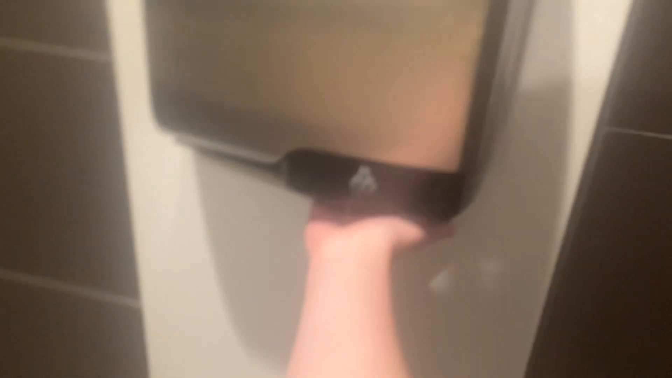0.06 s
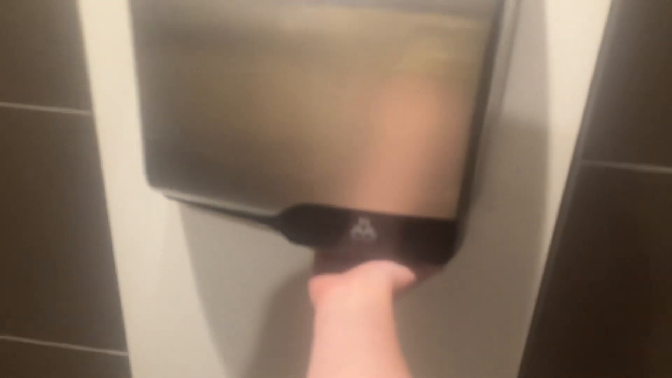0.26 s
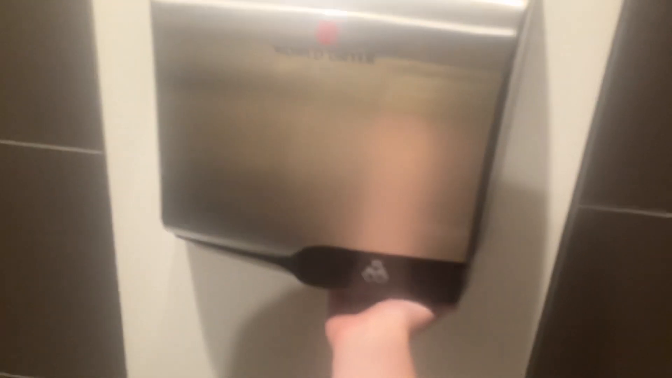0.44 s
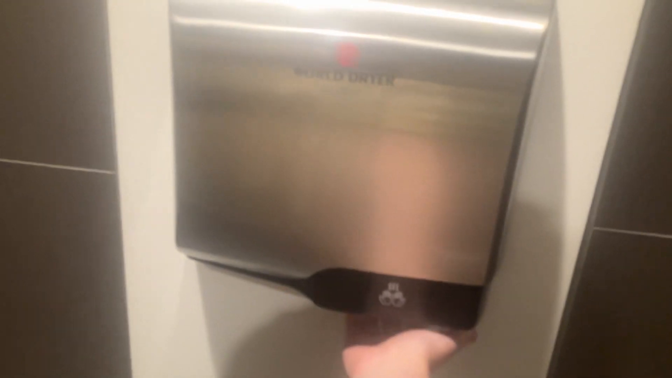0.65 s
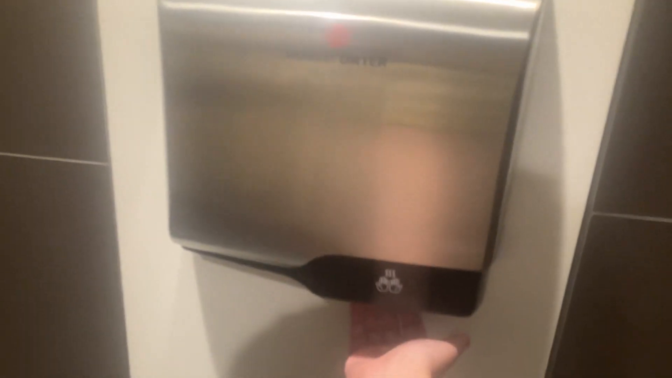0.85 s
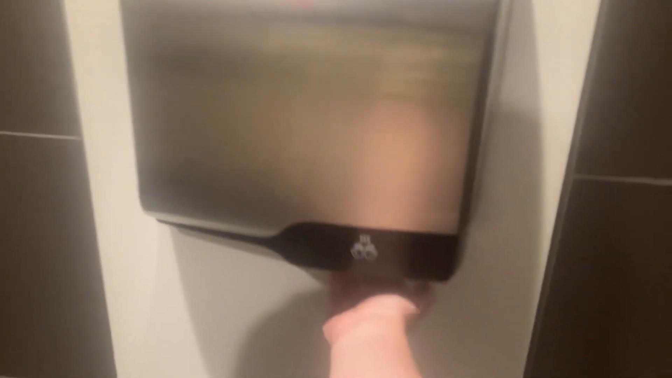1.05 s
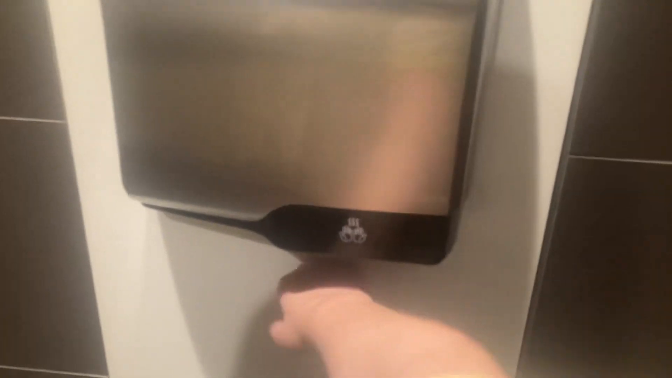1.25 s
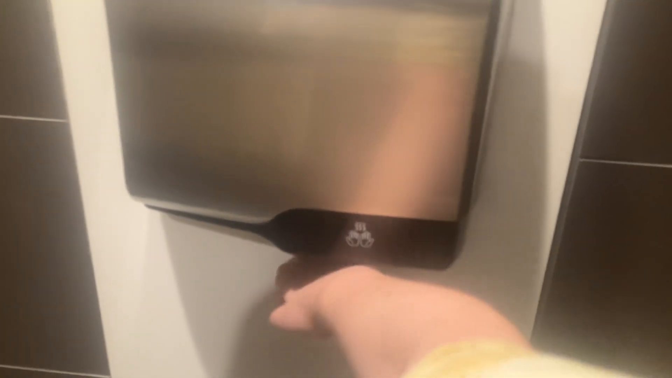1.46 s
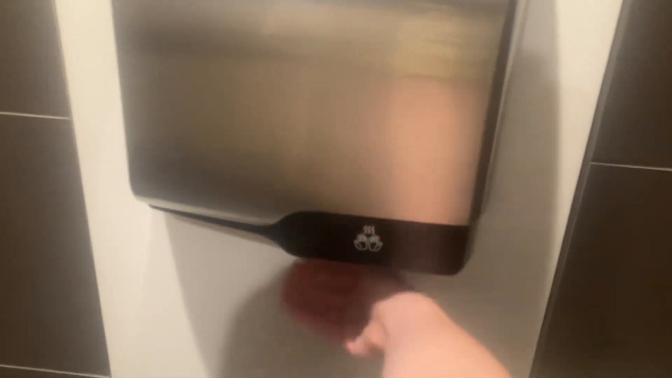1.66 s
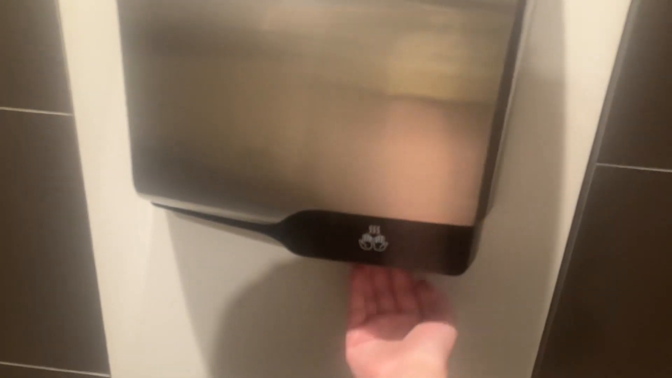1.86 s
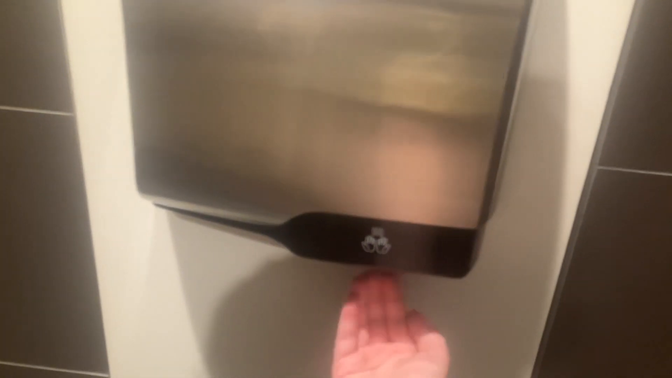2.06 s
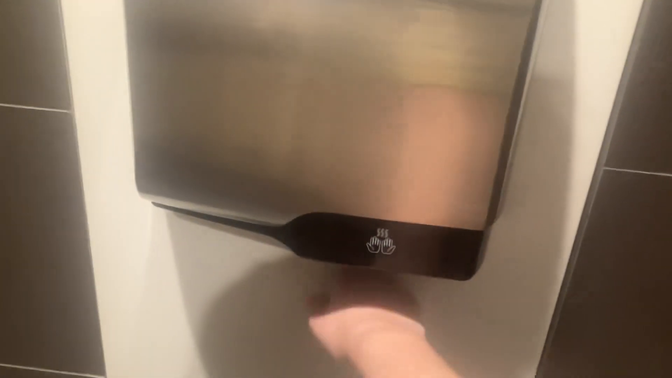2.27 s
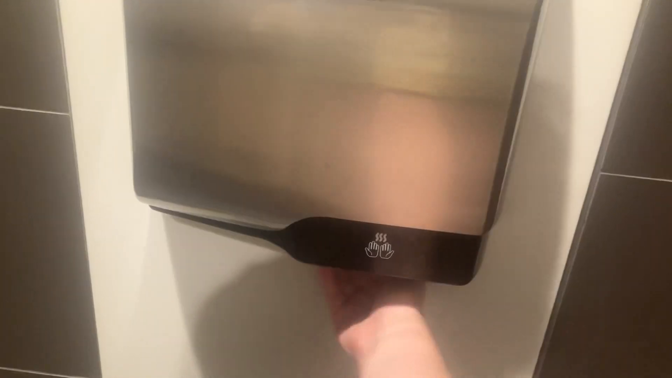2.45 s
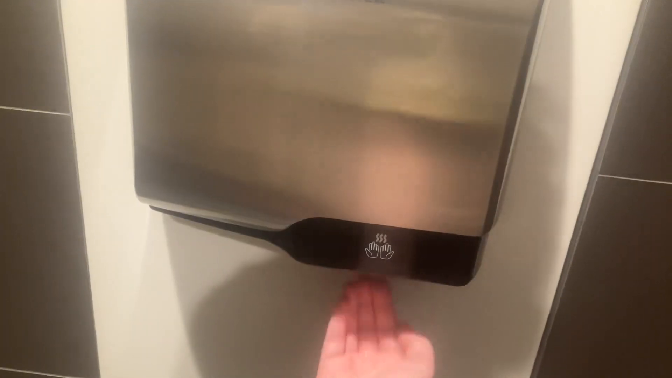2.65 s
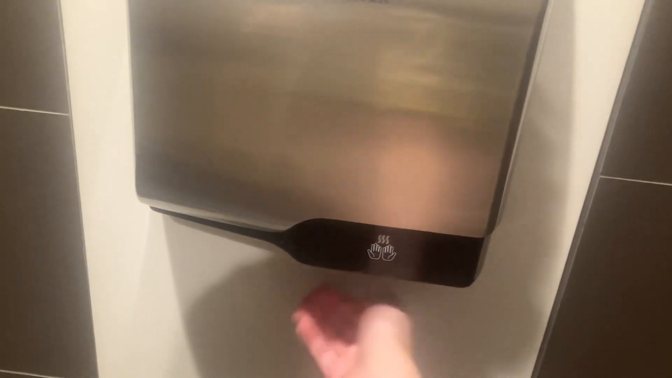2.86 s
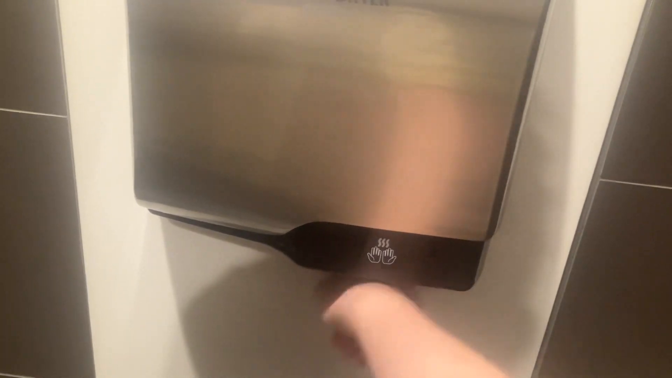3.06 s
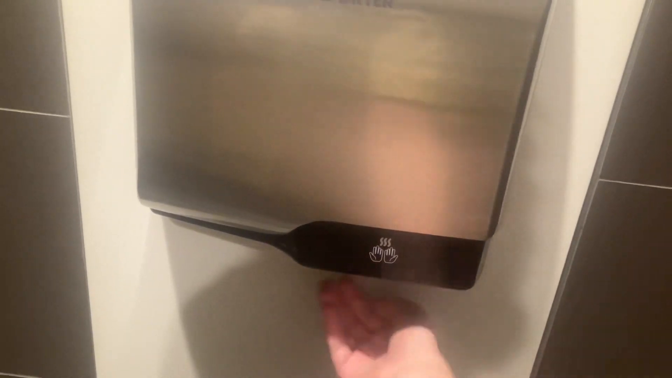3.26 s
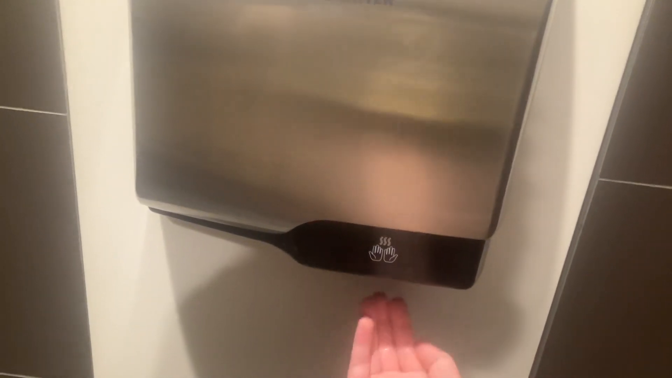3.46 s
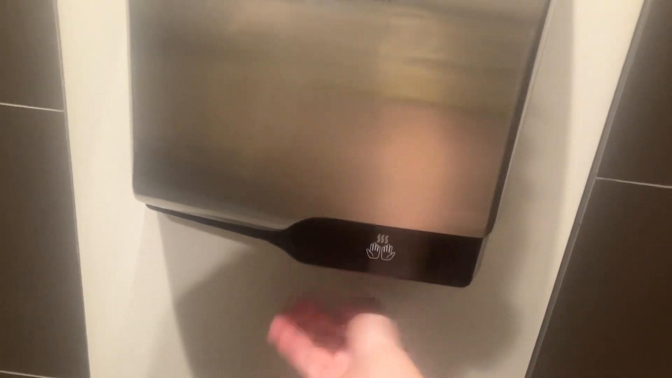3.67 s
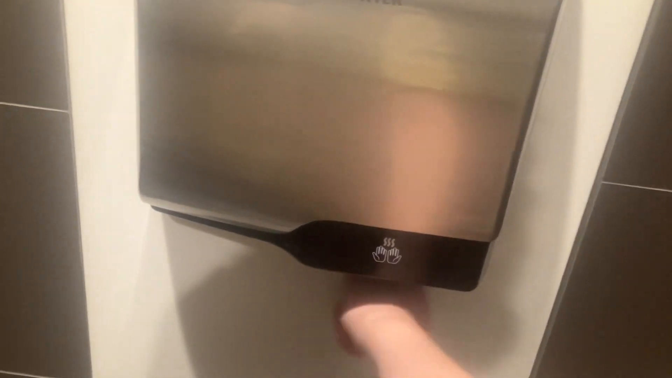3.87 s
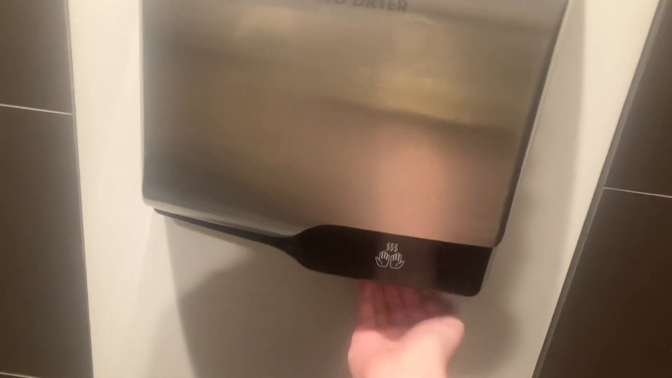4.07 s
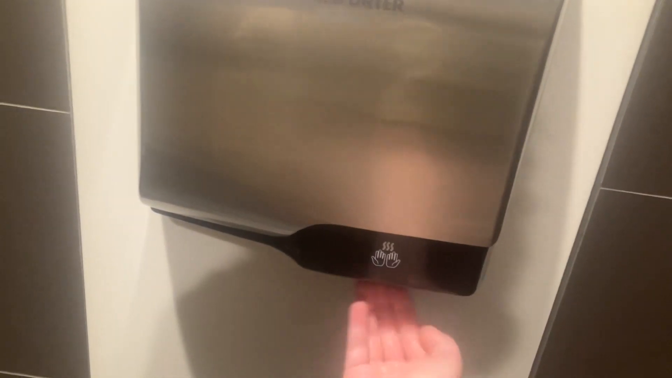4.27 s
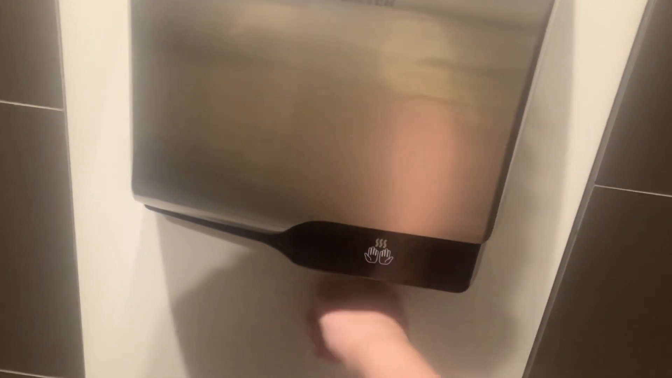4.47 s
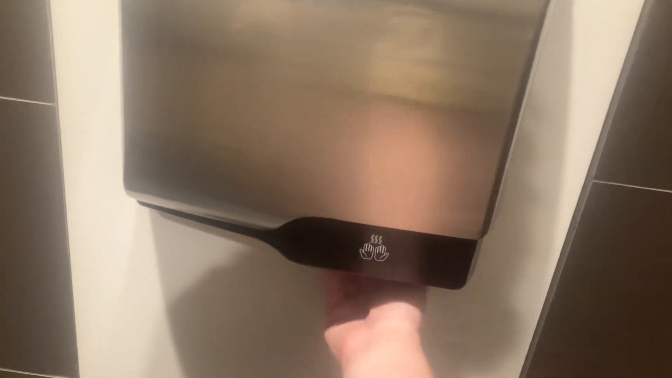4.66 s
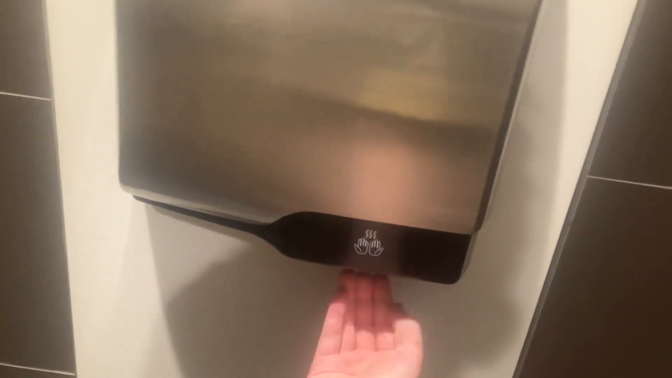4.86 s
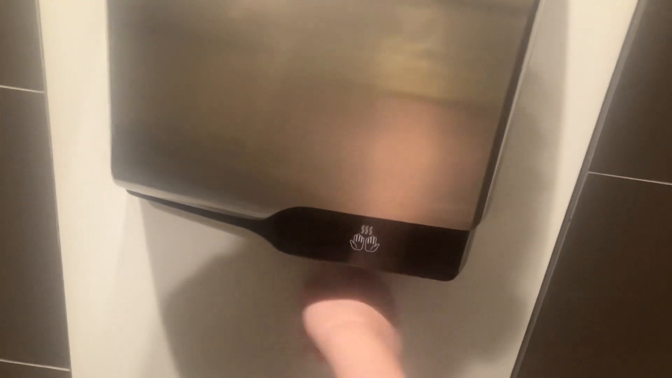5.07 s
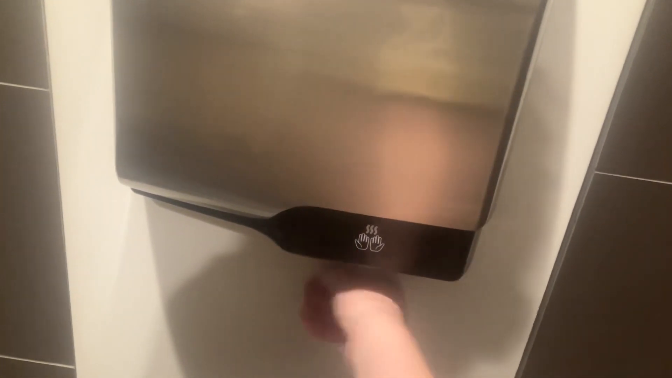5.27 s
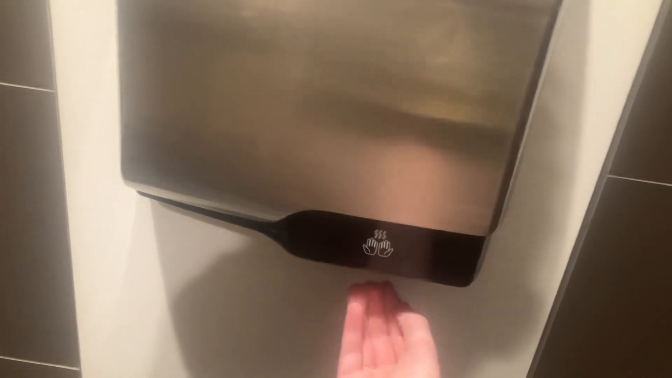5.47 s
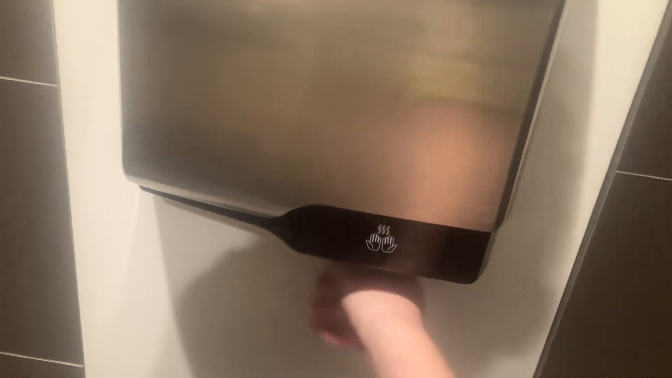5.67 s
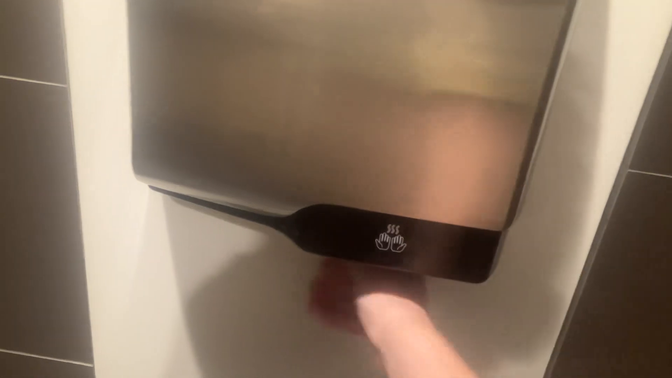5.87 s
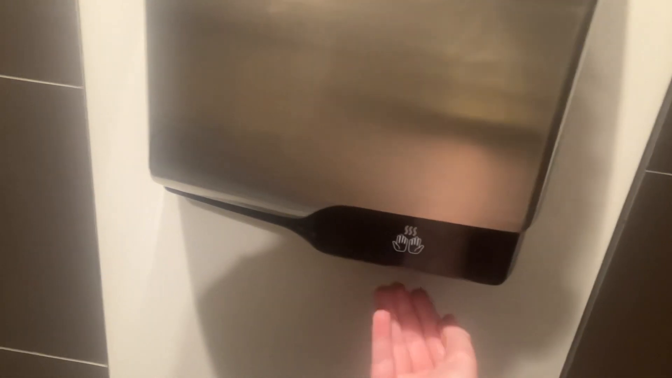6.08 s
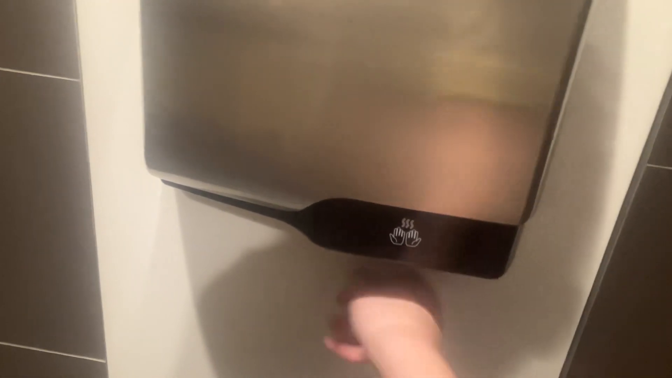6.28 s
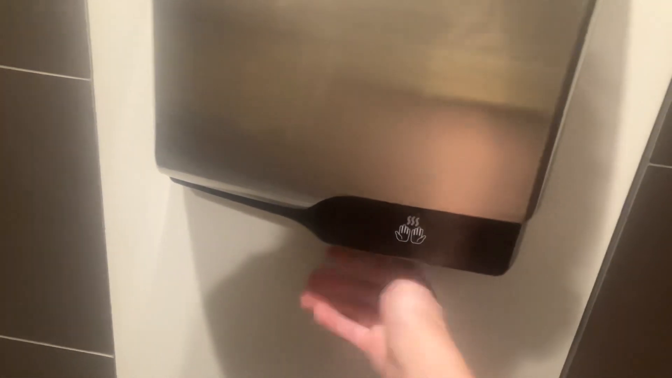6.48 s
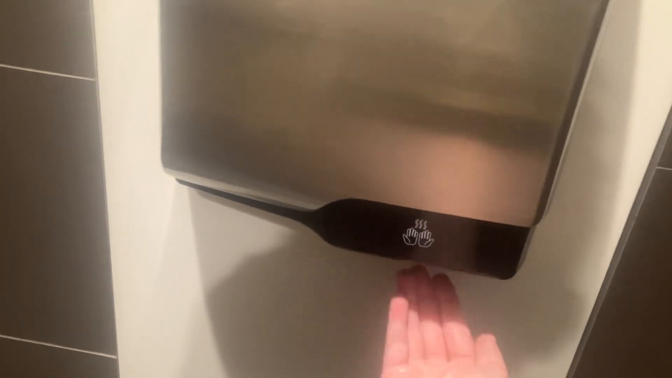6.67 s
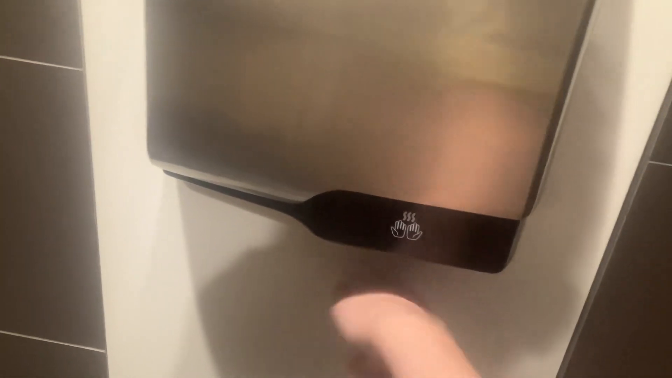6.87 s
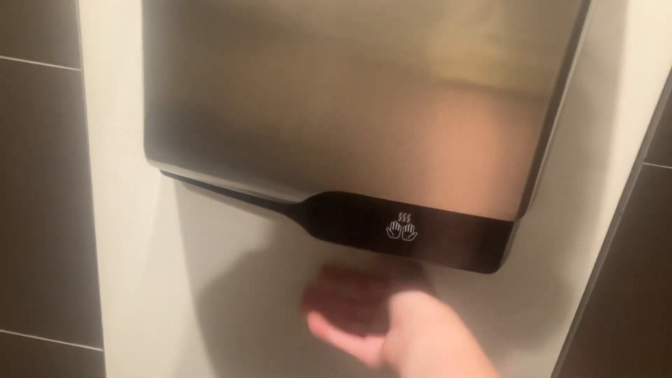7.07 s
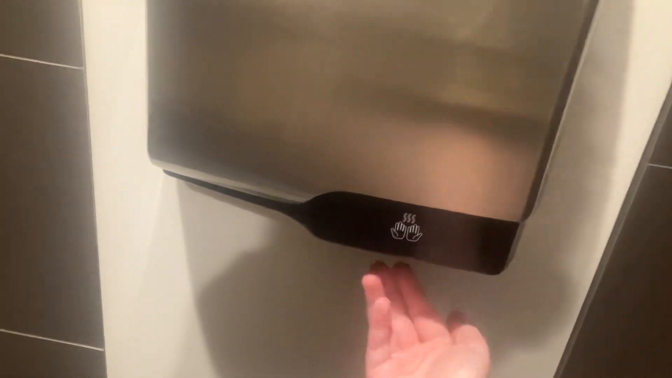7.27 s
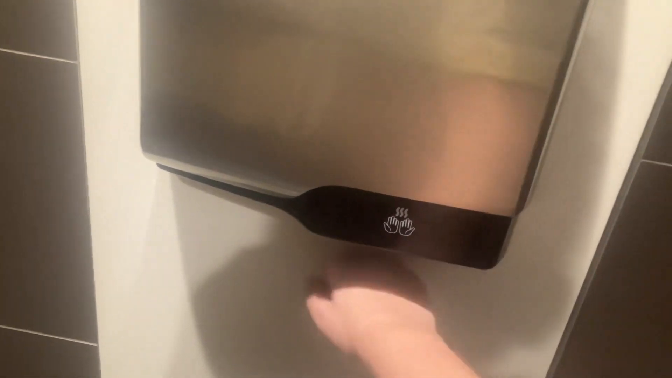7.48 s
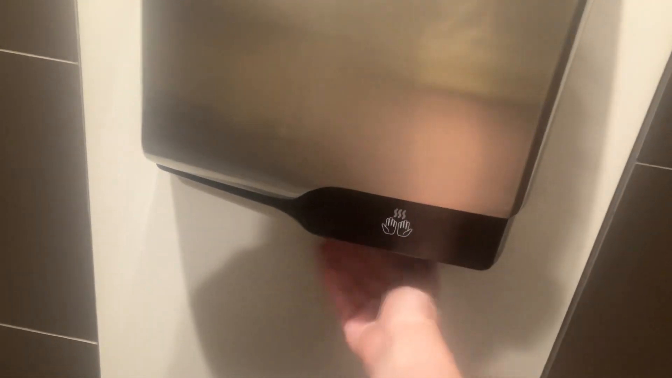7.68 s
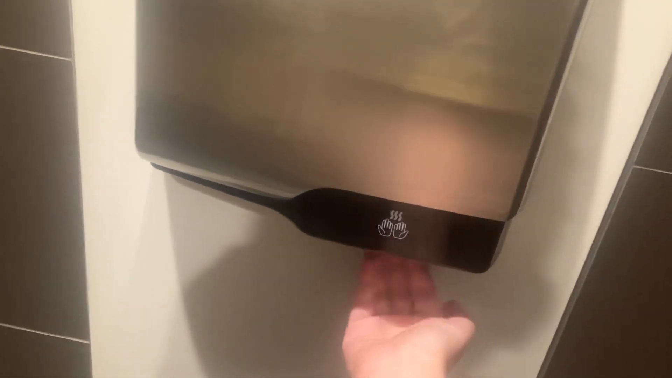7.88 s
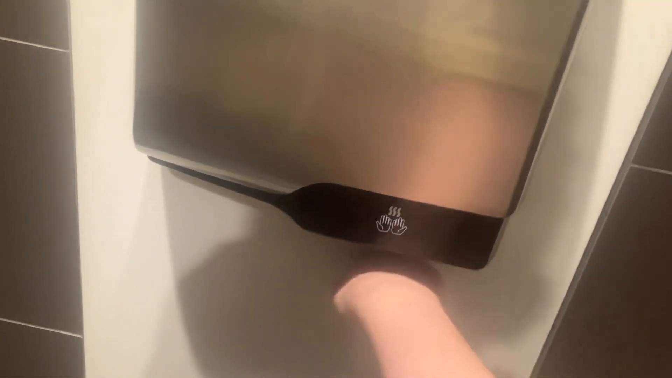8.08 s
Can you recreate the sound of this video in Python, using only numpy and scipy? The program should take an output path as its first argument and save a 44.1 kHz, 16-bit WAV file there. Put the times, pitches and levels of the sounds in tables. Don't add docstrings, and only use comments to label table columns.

```python
import sys
import numpy as np
from scipy import signal
from scipy.fft import rfft, irfft, next_fast_len
from scipy.io import wavfile
from scipy.ndimage import uniform_filter1d, map_coordinates

SR = 44100
rng = np.random.default_rng(int(sys.argv[2]) if len(sys.argv) > 2 else 0)


def undo_db(level):
    steps = np.asarray(level, float) / 20
    return 10 ** steps


def pcm_store(signal):
    levels = np.round(np.clip(np.atleast_2d(signal), -1, 1) * 32767)
    wavfile.write(sys.argv[1], SR, levels.astype(np.int16).T)


N = 358533
TIME_S = np.arange(N) / SR
COARSE_S = np.arange(0, N + 64, 64) / SR
FULL_HZ = 250.7

# pitch_hz, level_db (per Hz)
HISS = [(5200, -48), (5700, 0), (6200, 2.5), (7200, 1.5), (7600, 2.5), (8100, -1.5), (9000, -12),
        (9600, -16.5), (10300, -30.5), (10800, -58)]
# time_s, gain_db (over the settled roar)
GAIN = [(0, 16.5), (1.06, 8), (1.8, 3.5), (2.06, 4.5), (2.27, 2), (2.66, 1.5), (3.52, 0), (4.2, 1),
        (4.9, 1.5), (5.05, 0), (5.21, 1), (5.37, 0.4), (5.5, 1.5), (5.7, 0), (7.8, -0.5), (8.13, -0.1)]


def unit(x):
    return x / np.sqrt(np.mean(x ** 2) + 1e-20)


def along(points, hz):
    f, v = np.transpose(points)
    return np.interp(np.log(hz + 1), np.log(f + 1), v)


def fine(values):
    return np.interp(TIME_S, COARSE_S, values)


def wobble(rate, channels=1):
    knots = rng.standard_normal((channels, int(N * 40 / SR) + 4))
    return np.array([fine(map_coordinates(k, [COARSE_S * min(rate, 40)])) for k in knots])


def swells(rows):
    return fine(sum(db * np.exp(-((COARSE_S - s) / half) ** 2) for s, half, db in rows))


def switched_on(start_s, rise_s):
    return np.clip((TIME_S - start_s) / rise_s, 0, 1)


def filtered(x, response):
    m = 2 * next_fast_len(N // 2 + SR // 4)
    return irfft(rfft(x, m) * response(np.fft.rfftfreq(m, 1 / SR)), m)[..., :N]


def gain_db():
    s, db = np.transpose(GAIN)
    return np.interp(TIME_S, s, db)


def shaft():
    motor_on_s, kick_s, load_s, load_share = .464, .07, .269, .583
    t = np.clip(TIME_S - motor_on_s, 1e-3, None)
    slow_climb = load_share * np.exp(-t / load_s)
    pull_away = (1 - load_share) * np.exp(-t / kick_s)
    return FULL_HZ * (1 - slow_climb - pull_away)


def level(settled_db, growth):
    return settled_db + growth * 20 * np.log10(shaft() / FULL_HZ) + gain_db()


def ports(hz):
    # pitch_hz, width_hz, left_db, right_db
    standing = [(69, 14, 6.5, 3.5), (115, 14, 5.5, 7), (182.1, 17.6, 11, 9.5), (247, 38, 3, 6.5),
                (301.4, 20, 11.5, 8.5), (383, 44, 3, 2), (485, 20, -5, -11.5), (555, 36, 8, -2),
                (615, 28, 11, 11), (780, 38, -2.5, 1.5), (1094, 51, 7.5, 3.5), (1024.4, 39, -1, -6.5),
                (1275, 24, 6, 2.5), (1320, 36, 0, 4), (1450, 90, 6.5, 2.5), (1560, 33, -1, -1.5),
                (2014, 82, 5.5, 4), (2110, 70, 2, 3), (2800, 200, 2.5, 1.5)]
    # pitch_hz, left_minus_right_db
    port_colour = [(60, -2), (200, -1.5), (600, 0), (1500, 0.5), (3800, 1.5), (6000, 0.5), (7500, 8.5),
                   (8800, 18), (10000, 14)]
    peaks = 0
    for centre, width, left, right in standing:
        peaks = peaks + np.outer([left, right], 1 / (1 + (2 * (hz - centre) / width) ** 2))
    return undo_db(peaks + np.outer([.5, -.5], along(port_colour, hz)))


def rush(spectrum, patchy_db):
    # pitch_hz, left_right_likeness (0-1)
    likeness = [(60, 1), (250, 0.77), (600, 0.61), (1200, 0.38), (2500, 0.67), (5000, 0.18), (9600, 0.27)]
    z = signal.stft(rng.standard_normal((2, N)), nperseg=512)[2]
    patches = uniform_filter1d(rng.standard_normal(z.shape[1:]), size=6, axis=0)
    patches = uniform_filter1d(patches, size=14, axis=1)
    pair = signal.istft(z * undo_db(patchy_db * unit(patches)), nperseg=512)[1][:, :N]

    def mid_side(hz):
        angle = np.arccos(np.clip(along(likeness, hz), -1, 1)) / 2
        return undo_db(along(spectrum, hz)) * [np.cos(angle), np.sin(angle)]

    mid, side = filtered(pair, mid_side)
    out = filtered(np.array([mid + side, mid - side]), ports)
    return out / np.std(out.mean(axis=0))


def tiles(x):
    # pitch_hz, t60_s
    decay = [(200, 0.32), (2000, 0.66), (6000, 1), (10000, 0.099)]
    hz, t, z = signal.stft(rng.standard_normal((2, SR // 2)), SR, nperseg=256)
    tail = signal.istft(z * undo_db(-60 * t / along(decay, hz)[:, None]), SR, nperseg=256)[1]
    return signal.fftconvolve(x, tail / np.linalg.norm(tail[0]), axes=1)[:, :N]


def near_walls(x):
    # pitch_hz, level_db (against the direct sound)
    echo = [(100, -25), (500, -5.5), (1500, -7.5), (4000, -2.5), (9000, -11)]
    lag_samples = 1.9
    t = np.arange(SR // 4) / SR
    cluster = (t > .002) * undo_db(-60 * t / 0.14) * rng.standard_normal((2, len(t)))
    cluster /= np.linalg.norm(cluster, axis=1, keepdims=True)

    def paths(hz):
        share = undo_db(along(echo, hz))
        direct = np.exp(-1j * np.pi * np.outer([lag_samples, -lag_samples], hz) / SR)
        return (direct + share * rfft(cluster, 2 * len(hz) - 2)) / np.sqrt(1 + share ** 2)

    return filtered(x, paths)


def washroom():
    # pitch_hz, level_db (per Hz)
    low = [(15, -39.5), (25, -17), (35, -16), (50, -3), (70, 0), (130, -1), (170, -10), (230, -55.5)]
    # pitch_hz, level_db (per Hz)
    vent = [(150, -26), (220, -6), (500, 1.5), (650, -6), (800, -0.5), (1200, -17), (1600, -46.5)]
    # pitch_hz, level_db (per Hz)
    scuff_colour = [(700, -40), (1100, -14.5), (1800, -5), (2500, -6.5), (3500, -10), (4600, -7.5),
                    (5200, -16), (6500, -26), (7500, -53.5)]
    # time_s, half_length_s, level_db
    grip = [(0, 0.037, 4), (.23, 0.03, 6), (.33, 0.1, -8.5), (.55, 0.07, 2), (1.3, .3, -1), (2.04, 0.17, 6),
            (2.69, .07, 10), (3.64, 0.24, 7), (4.87, .05, 6), (5.44, .05, 4), (7.1, .06, 6)]
    vent_puffs = [(0, 0.016, 3.8), (.17, .04, 6.5)]  # time_s, half_length_s, level_db
    vent_db = -45.5 - 9 * TIME_S + swells(vent_puffs)

    scuff_s, rise_s, hold_s, fall_db_per_s = .1, 0.027, .08, 58
    scuff_db = -41.5 - fall_db_per_s * np.clip(TIME_S - scuff_s - hold_s, 0, None)
    scuff = undo_db(-54) + switched_on(scuff_s, rise_s) * undo_db(scuff_db)

    quickens_s = .22
    fading_db = -50 - 23 * (TIME_S + 2 * np.clip(TIME_S - quickens_s, 0, None))

    quiet = undo_db(vent_db) * rush(vent, patchy_db=1.2)
    quiet += scuff * rush(scuff_colour, patchy_db=1.2)
    quiet += undo_db(fading_db) * rush(HISS, patchy_db=1.2)
    drowned = 1 - switched_on(.55, .3)
    rumble_db = -45 + 0.75 * gain_db() + swells(grip) + 1.5 * wobble(6)
    return quiet * drowned + undo_db(rumble_db) * rush(low, patchy_db=-0.2)


def vent_hum():
    # pitch_hz, level_db
    vent_lines = [(622, -48), (663, -49)]
    hum = 0
    for hz, db in vent_lines:
        hum = hum + undo_db(db + wobble(8, channels=2)) * np.sin(2 * np.pi * hz * TIME_S)
    return hum * switched_on(.03, 0.043) * (1 - switched_on(0.7, .3))


def relay():
    # pitch_hz, level_db
    click_colour = [(200, -34), (1000, -3), (3500, -3), (5200, -15), (6700, 8), (8200, -4), (10300, -14),
                    (11000, -60)]
    # start_s, level_db
    hit = (.457, -25)
    start_s, level_db = hit
    since_s = np.clip(TIME_S - start_s, 0, None)
    decay = undo_db(level_db - 60 * since_s / 0.089)
    burst = switched_on(start_s, 0.0088) * decay * rng.standard_normal((2, N))
    return filtered(burst, lambda hz: undo_db(along(click_colour, hz)) * ports(hz))


def air():
    # pitch_hz, level_db (per Hz)
    casing = [(110, -33.5), (140, -6.5), (250, -1), (500, 0.5), (900, 3), (1050, -8.5), (1300, -48.5)]
    # pitch_hz, level_db (per Hz)
    jet = [(800, -41), (950, -1.5), (1100, 2), (1500, -1), (1800, -1.5), (2400, -1.5), (3000, -4),
           (3200, -10.5), (3700, -59)]
    # pitch_hz, level_db (per Hz)
    splash = [(2700, -49), (3000, -20.5), (3300, -0.5), (4100, -2), (4350, 1.5), (4700, 2.5), (5050, 1.5),
              (5450, -6), (5900, -20.5), (6600, -45.5)]
    flutter = wobble(14)
    casing_db = level(-28.5, 3.4) + 0.2 * wobble(4) + 0.1 * flutter
    jet_db = level(-28.5, 3.8) + 0.3 * wobble(4.37) + 0.46 * flutter
    splash_db = level(-33.5, 3.6) + 0.44 * wobble(6.8) + 0.91 * flutter
    hiss_db = level(-38.5, 4.4) + .4 * wobble(4) + 0.19 * flutter
    out = undo_db(casing_db) * rush(casing, patchy_db=0.37)
    out += undo_db(jet_db) * rush(jet, patchy_db=1.42)
    out += undo_db(splash_db) * rush(splash, patchy_db=1.2)
    out += undo_db(hiss_db) * rush(HISS, patchy_db=0.93)
    return out


def finger_flicker():
    share = .62
    echo_real, echo_imag = share * wobble(17, channels=2)
    return np.tanh(1.3 * np.hypot(1 + echo_real, .3 * echo_imag))


def motor():
    # multiple, left_db, right_db, left_lead_rad
    weak_orders = [(1.987, -47, -39, 2.5), (3.99, -39.5, -48, 1.7), (5.1, -39, -53.5, 4.5),
                   (7.08, -46, -64.5, 0.69), (8.9, -57, -60.5, 0.9), (24.6, -67.5, -61.5, 26),
                   (27.6, -62, -65, 2), (31.7, -57, -74, 5.5)]
    # pitch_hz, width_hz, level_db
    duct_peaks = [(2050, 250, -12), (2700, 220, -8), (3500, 320, 2), (3880, 300, 1), (4400, 600, -14),
                  (5000, 450, 2), (5780, 260, -1), (6050, 300, 0)]
    # time_s, half_length_s, level_db
    hand_whine = [(1.05, 0.025, 4), (1.64, 0.2, 3), (1.86, 0.046, -15), (2.21, 0.042, -6),
                  (2.56, 0.2, -7.5), (3.17, 0.098, -10), (3.33, 0.034, 14.5), (3.47, 0.034, -10),
                  (3.88, 0.077, -12), (4.03, 0.027, -5), (4.34, 0.2, -4.5), (4.69, 0.034, -13),
                  (4.94, 0.058, 8), (5.25, 0.037, -20), (5.55, 0.28, 10.5), (5.58, 0.065, -3),
                  (5.99, 0.05, 3), (6.17, 0.038, 9), (6.34, 0.037, 4.5), (6.51, 0.042, -13),
                  (6.59, 0.044, 7), (6.93, 0.13, 8), (7.08, 0.026, -4), (7.36, 0.016, 6), (7.5, 0.062, 10),
                  (7.61, 0.021, 0), (7.73, 0.03, -6), (7.84, 0.067, 9)]
    # time_s, half_length_s, level_db
    hand_blade = [(1.11, 0.28, -8), (1.81, 0.04, 9), (2.17, 0.06, 11), (2.46, 0.061, 3), (2.75, 0.17, 1.5),
                  (3.53, 0.044, 10.5), (4.07, 0.064, 11.5), (4.38, 0.07, 11), (5.44, 0.12, -3),
                  (5.94, 0.18, -4), (7.46, 0.037, 10), (7.77, 0.12, -7)]
    shaft_hz = shaft()
    turn = 2 * np.pi * np.cumsum(shaft_hz + .27 * wobble(30)[0]) / SR
    sides = np.array([[.5], [-.5]])

    def tone(multiple, lead_rad):
        phase = multiple * turn + sides * lead_rad + .35 * wobble(12, channels=2)
        return np.sqrt(2) * np.sin(phase)

    duct = 0
    for hz, width, db in duct_peaks:
        duct = duct + undo_db(db) / (1 + (2 * (24 * shaft_hz - hz) / width) ** 4)
    pan_db = np.clip(4 + 2.5 * wobble(5)[0], 0, 8)
    whine_db = level(-33, 0) + swells(hand_whine) + sides * pan_db + 1.5 * wobble(35, channels=2)
    blade_db = level(-40, 8.3) + swells(hand_blade) + 2.5 * sides + 3 * wobble(30, channels=2)
    hum_db = level(-42.5, 1.5) + 3 * wobble(14) - 5 * sides

    out = duct * finger_flicker() * undo_db(whine_db) * tone(24, 1.78)
    out += finger_flicker() * undo_db(blade_db) * tone(20, 1.17)
    out += undo_db(hum_db) * tone(1, .3)
    held_db = level(-3, 3.4)
    for multiple, left, right, lead_rad in weak_orders:
        order_db = held_db + [[left], [right]] + 1.8 * wobble(6, channels=2)
        out += undo_db(order_db) * tone(multiple, lead_rad)
    return out * switched_on(.48, .03)


def scene():
    whine, click = motor(), relay()
    climbing = 1 - switched_on(1.0, .4)
    whine_send = undo_db(4) * whine * climbing * (shaft() / FULL_HZ) ** 5
    wet = tiles(whine_send + undo_db(-2.5) * click)
    direct = whine * undo_db(-1.5 * climbing) + click
    return direct + wet + vent_hum() + near_walls(air() + washroom())


def roll_off(x):
    return signal.sosfilt(signal.butter(12, 10240, fs=SR, output="sos"), x)


def record(dry):
    # usual_hz, occasional_hz
    edge_hz = [(9650, 10250), (8950, 9450)]
    usual, occasional = np.array(edge_hz)[:, :1], np.array(edge_hz)[:, 1:]
    hz, t, z = signal.stft(dry, SR, nperseg=2048)
    spare = uniform_filter1d(rng.standard_normal((2, len(t))), size=2, axis=1) > [[.45], [.9]]
    edge = np.where(spare, occasional, usual)
    mix = signal.istft(z * (hz[:, None] < edge[:, None]), SR, nperseg=2048)[1][:, :N]
    return roll_off(mix)


dry = scene()
out = record(dry)
pcm_store(out)
```